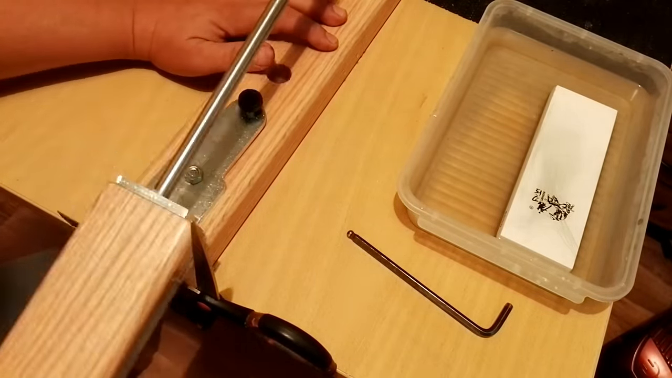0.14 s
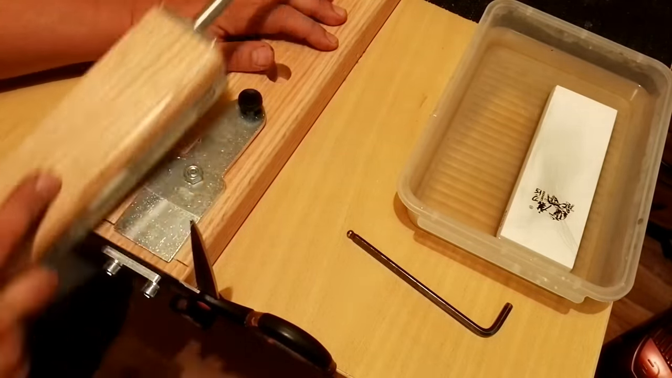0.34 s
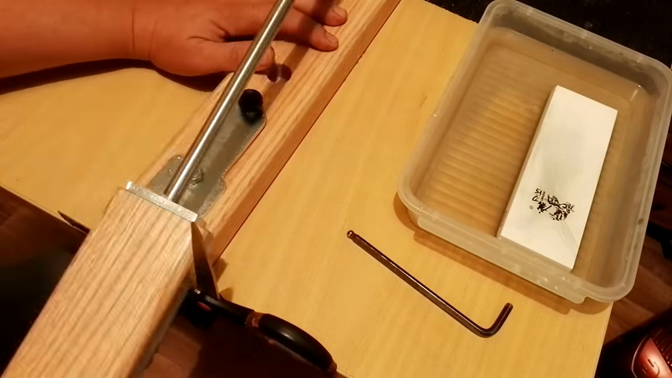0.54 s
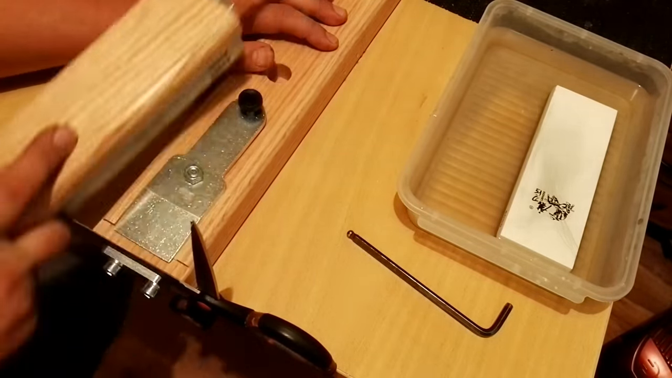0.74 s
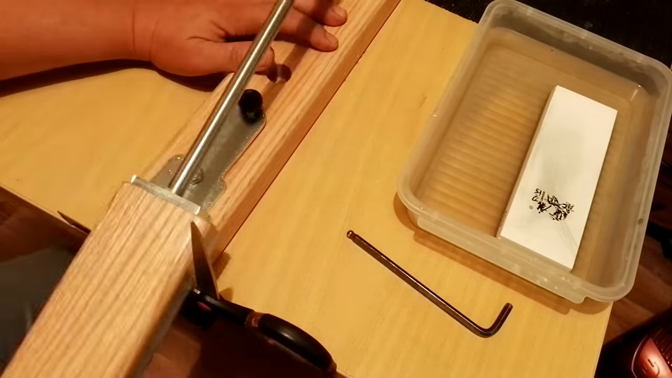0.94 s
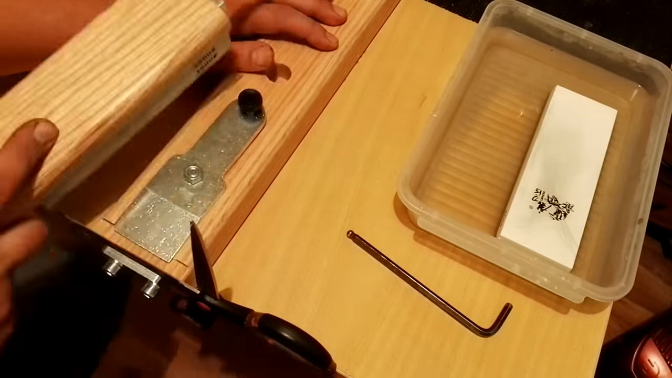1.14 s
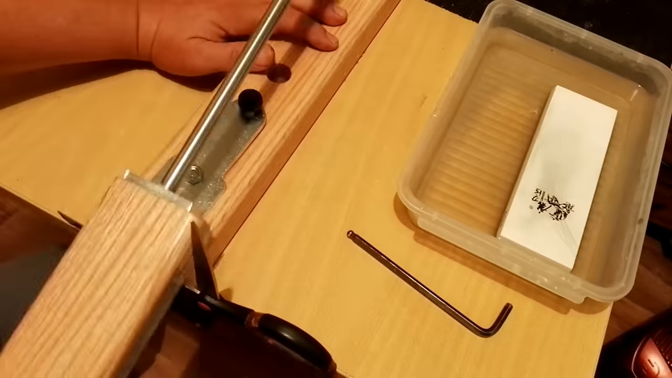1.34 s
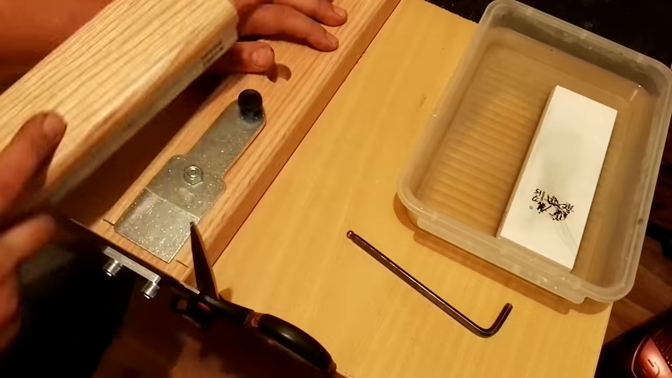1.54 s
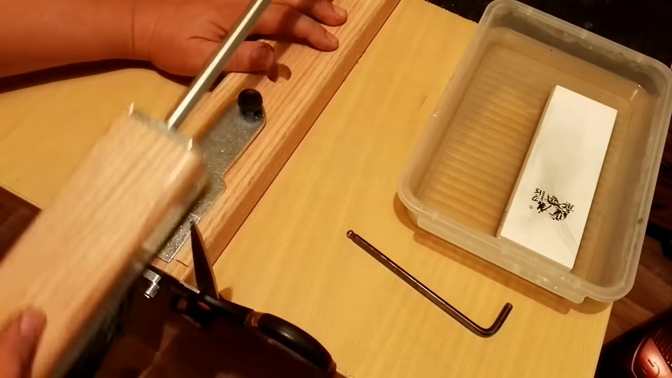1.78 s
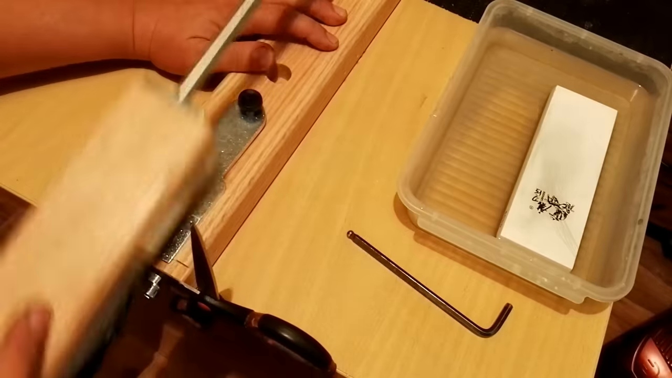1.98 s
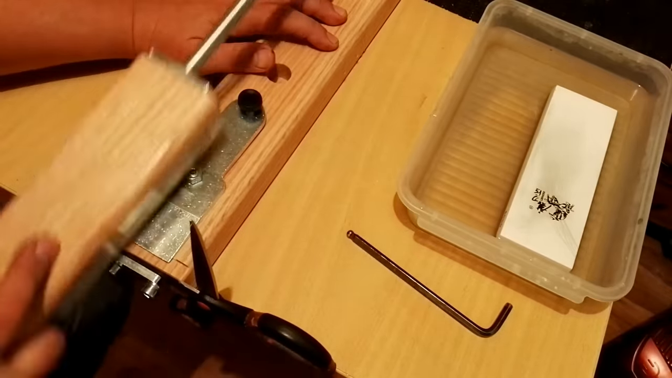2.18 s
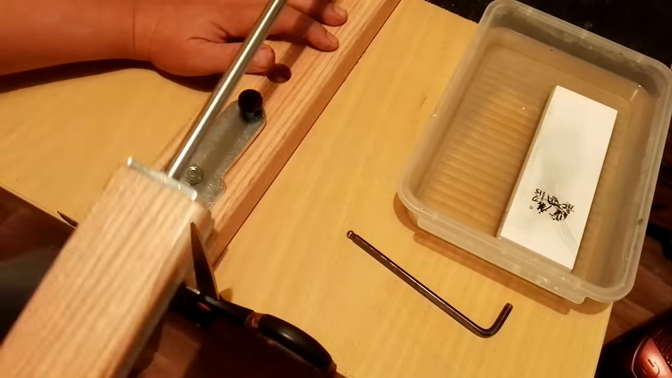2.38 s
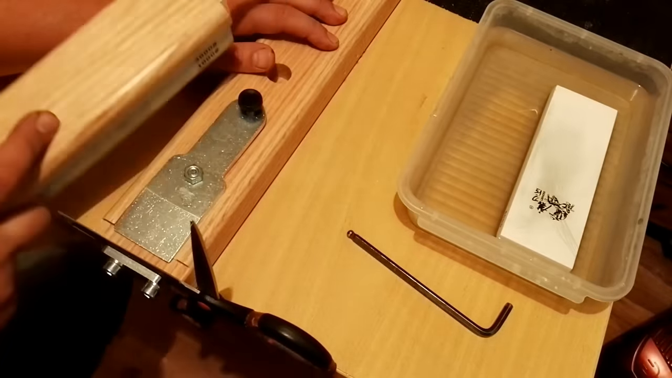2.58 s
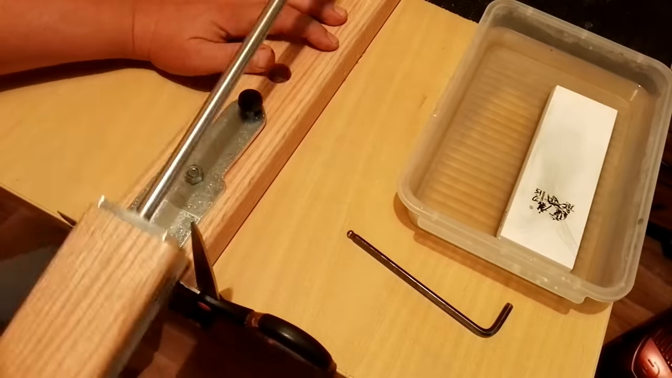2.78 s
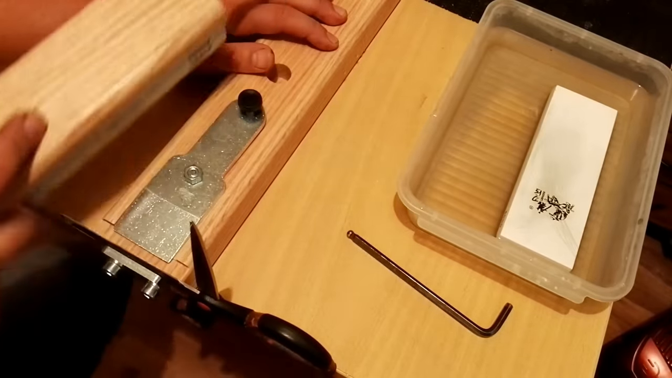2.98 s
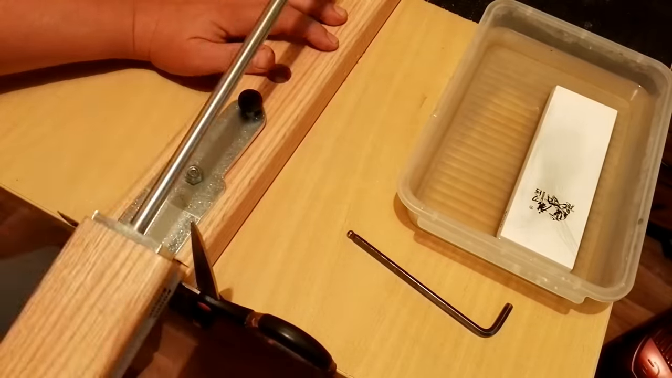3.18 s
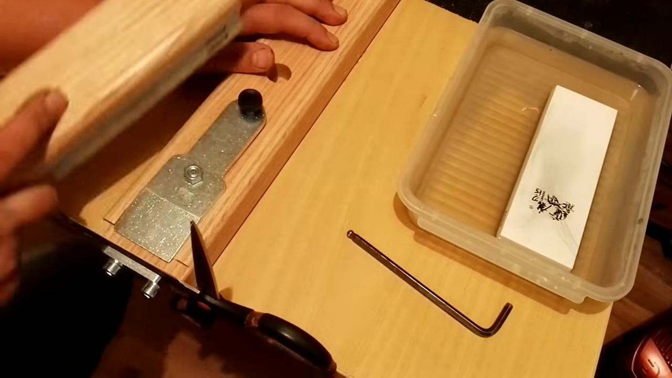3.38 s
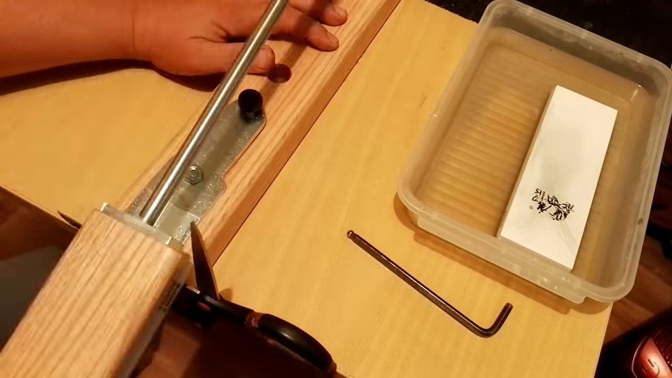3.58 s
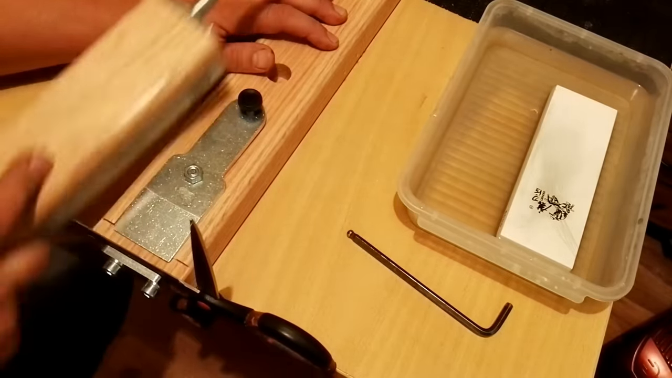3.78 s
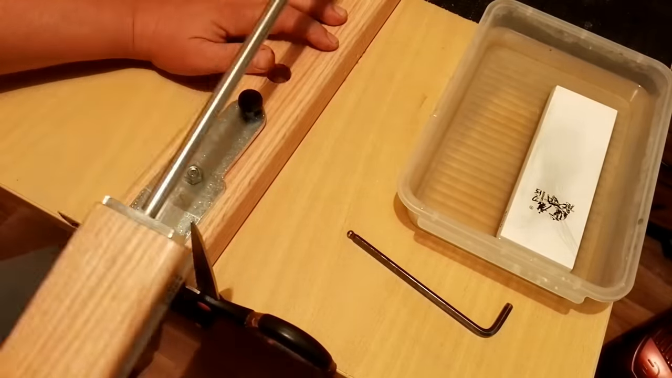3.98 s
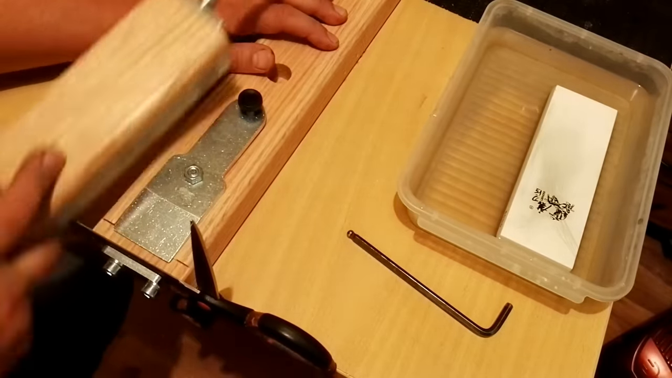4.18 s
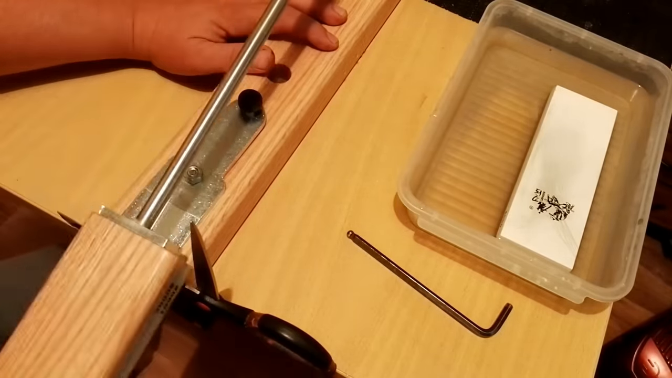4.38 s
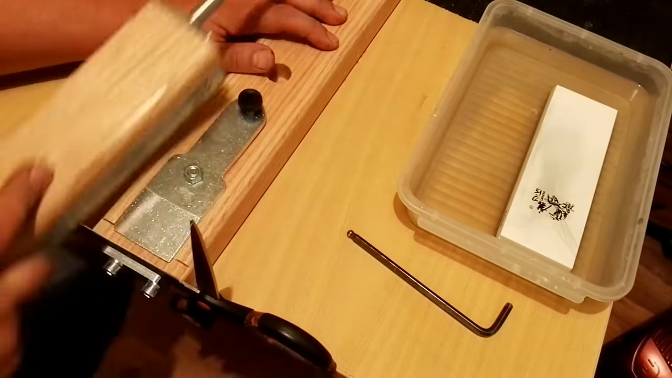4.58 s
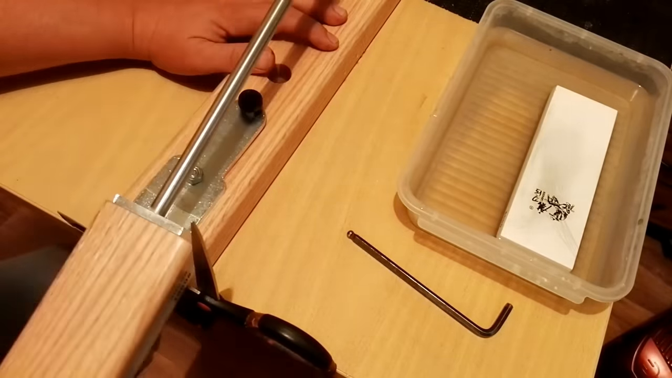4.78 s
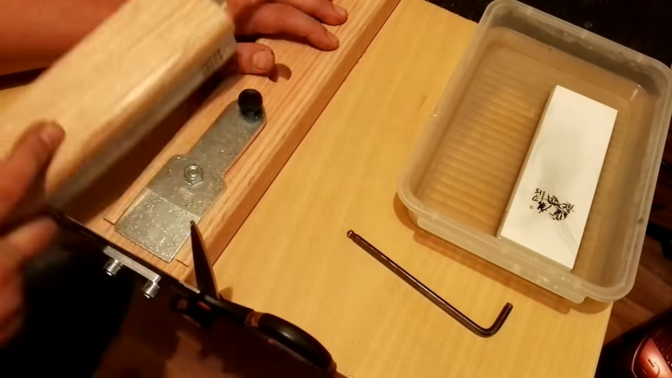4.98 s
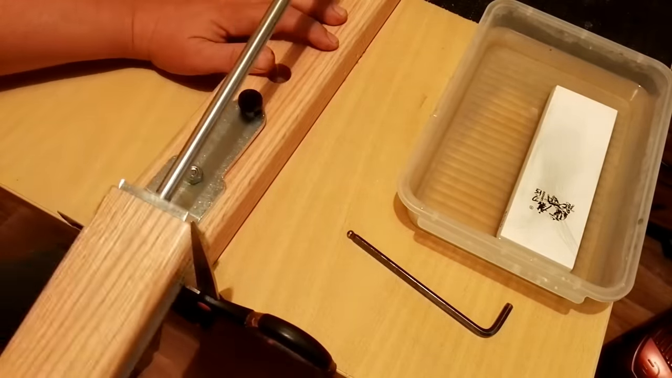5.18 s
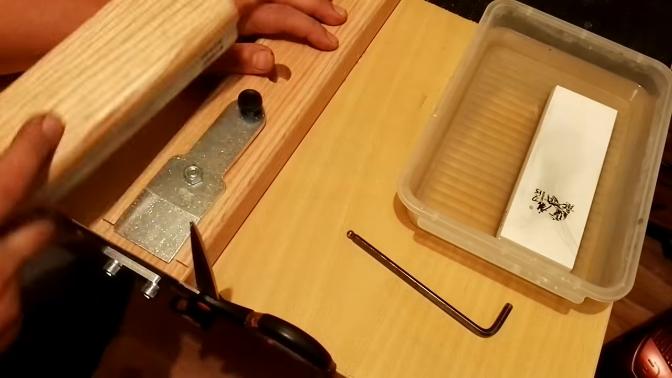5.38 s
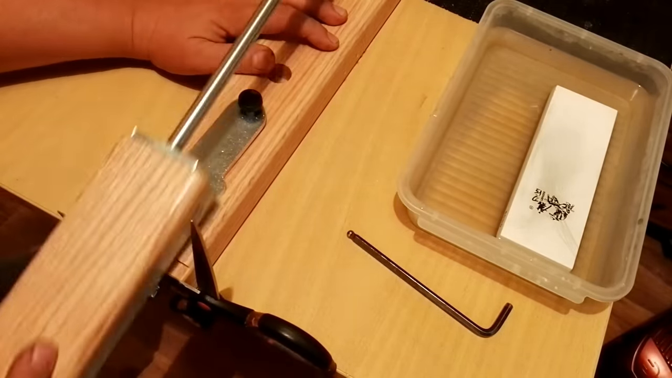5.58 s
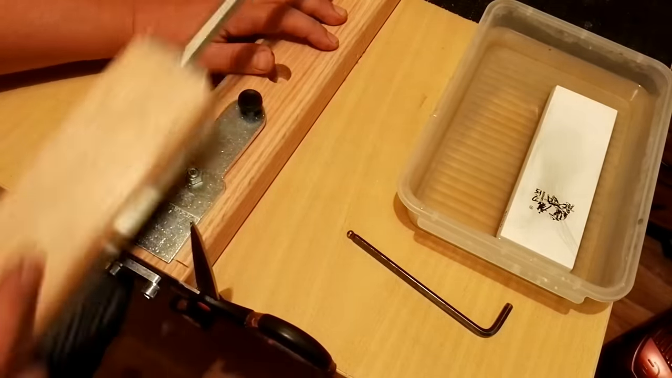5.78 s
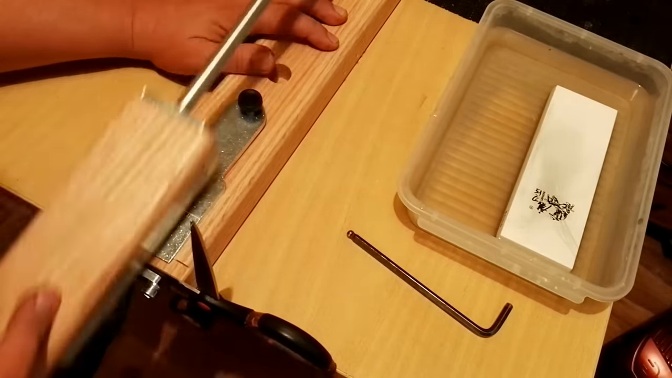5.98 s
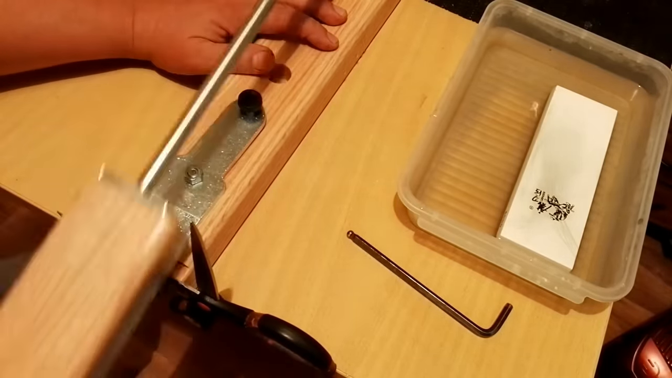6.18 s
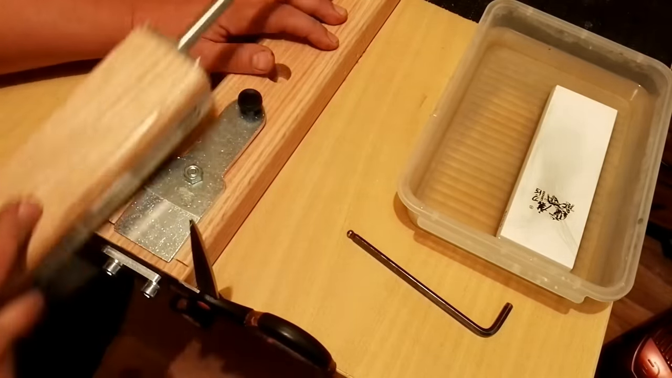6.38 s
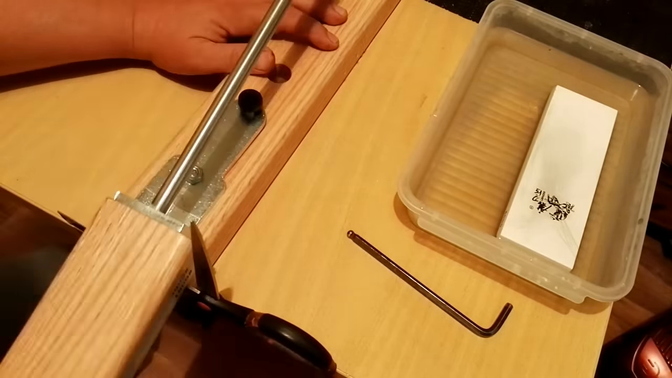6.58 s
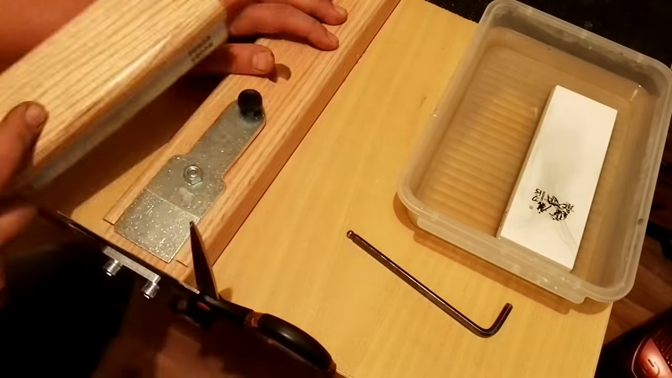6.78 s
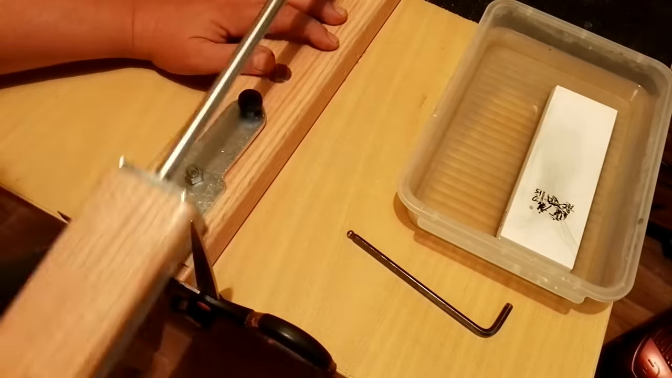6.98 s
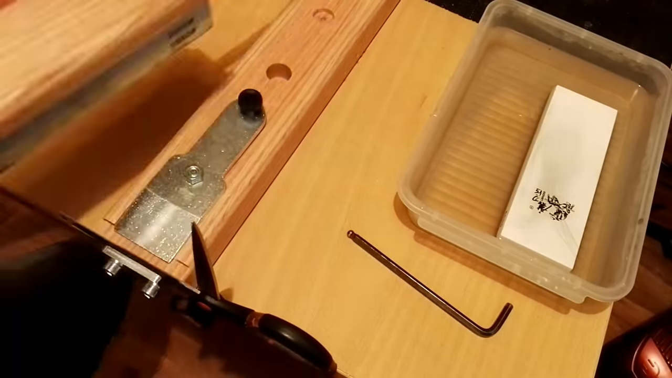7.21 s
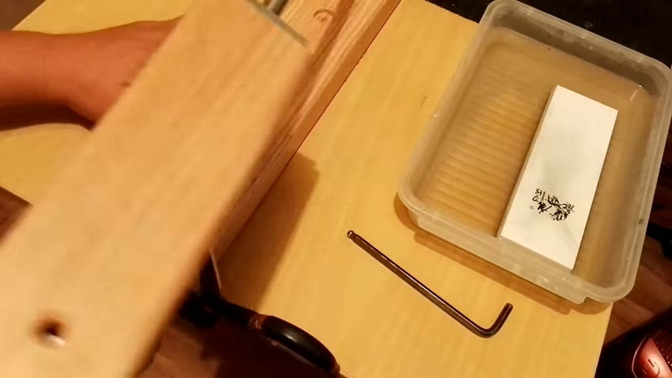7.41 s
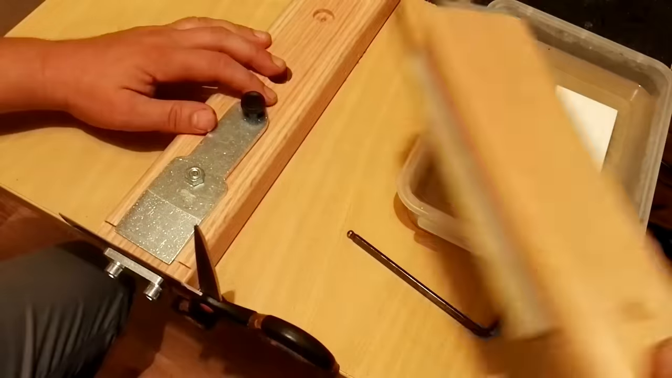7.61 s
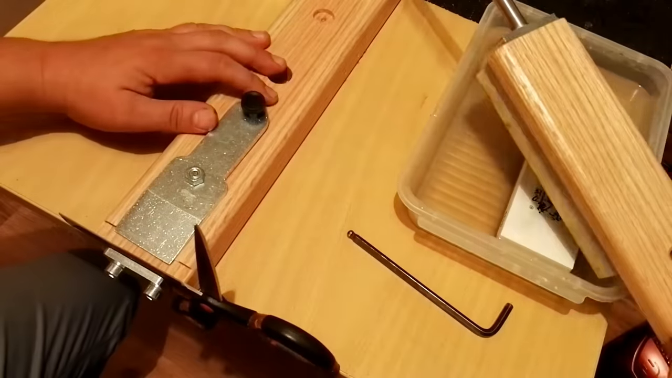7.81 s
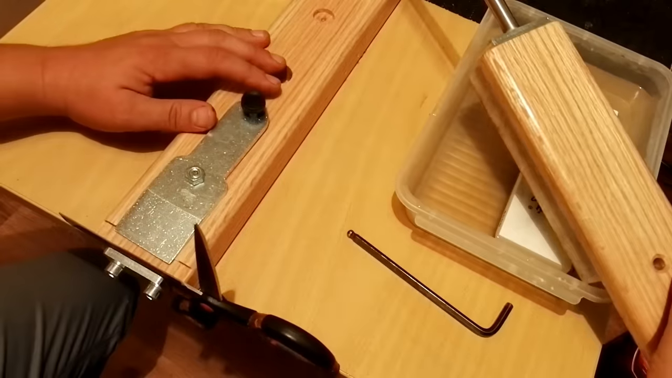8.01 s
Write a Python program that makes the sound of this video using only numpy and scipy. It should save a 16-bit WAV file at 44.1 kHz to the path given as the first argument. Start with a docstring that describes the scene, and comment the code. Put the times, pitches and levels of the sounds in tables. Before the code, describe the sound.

In a small, fairly dry room, heard close up in stereo, a wet whetstone on a guide rod sharpens a scissors blade clamped in a wooden jig. A stroke is already under way at 0 seconds; from 0.26 to 7.16 more follow, nearly three a second, each about 0.2 seconds long. Each lands with a steel clack and low wooden thud, then a coarse rasp and fine, bright hiss over a woody hum, stopping quickly. Between them the rod slides back much more softly, with faint whistles, grazing ticks and tiny squeaks, the clearest near 3.6. Very brief edge shrieks come at 3.4 and 6.2. After 7.2 a small rattle leads to a loud metallic click at 7.29, with a fainter one at 7.45. Light brushes follow, then the wooden holder knocks on a plastic tub at 7.8 and 8.0, over near silence.

```python
"""A wet whetstone on a guide rod grinds along a scissors blade clamped in a wooden jig on a desk.
Each push is filtered fracture noise: a coarse rasp and a fine hiss, with the jig and the stone's block resonating.
Landings and lift-offs are short impulses through resonances; the returning rod rubs, whistles and squeaks.
Then the rod is unhooked with a loud click and the wooden holder is laid on a plastic tub, all modal impacts.
The room is small and the microphone close."""
import sys
import numpy as np
from scipy import signal
from scipy.fft import rfft, irfft, next_fast_len
from scipy.io import wavfile
from scipy.ndimage import uniform_filter1d, minimum_filter1d, map_coordinates

SR = 44100
rng = np.random.default_rng(int(sys.argv[2]) if len(sys.argv) > 2 else 0)


def master(y):
    """Save y as 16-bit WAV."""
    cut = np.clip(np.atleast_2d(y).T, -1, 1)
    pcm = np.round(cut * 32767)  # scale
    wavfile.write(sys.argv[1], SR, pcm.astype(np.int16))


N = 355005
TIME = np.arange(N) / SR
SIZE = next_fast_len(N + SR // 2, True)
FREQ = np.maximum(np.arange(SIZE // 2 + 1) * SR / SIZE, 1)

# Table levels are relative: layers add their own trims, and every spectrum is scaled to unit power.
# Strokes: land_s, lift_s, clack_db (steel), thud_db (desk), knock_db (wood), rock_db (jig rocking back),
# push_db (grinding), lean_db (rise of the fine hiss along the push), return_db (rod sliding back)
STROKES = [(-.125, 0.065, -38, -49, -50, -57, -47.5, 8, -63),
           (.259, 0.453, -33.5, -50, -58, -54, -46.5, -1, -64),
           (0.634, 0.825, -37, -51, -54, -54, -46, -3, -66),
           (1.012, 1.191, -33, -43.5, -43.5, -62, -46, -2, -65),
           (1.378, 1.585, -44.5, -52, -54, -55.5, -47.5, 5.5, -66),
           (1.79, 1.978, -35, -46.5, -38, -62, -47, -10, -67),
           (2.148, 2.322, -33, -52, -40.5, -43.5, -45.5, -7, -70.5),
           (2.489, 2.643, -36, -48, -51, -45, -45.5, -8, -63.5),
           (2.826, 3.007, -36.5, -43, -49.5, -55, -45.5, 1, -66.5),
           (3.238, 3.431, -55.5, -59, -61, -59, -47, 3, -63.5),
           (3.676, 3.869, -40, -50.5, -47.5, -59, -46.5, 4.5, -61),
           (4.076, 4.261, -39, -45.5, -51, -57, -46.5, 1, -63.5),
           (4.452, 4.671, -41.5, -50.5, -53.5, -55, -46.5, 5, -64),
           (4.856, 5.047, -38, -51, -47.5, -58, -46.5, -1, -66),
           (5.24, 5.424, -37, -49.5, -49, -52, -46.5, -5, -67.5),
           (5.604, 5.765, -41.5, -43.5, -50.5, -61, -46, -1, -68),
           (5.957, 6.131, -36.5, -44.5, -58, -55, -46, 1, -62),
           (6.315, 6.486, -37.5, -50, -48, -64, -46, 0, -66.5),
           (6.652, 6.836, -37.5, -50, -50, -59, -46.5, 7, -66.5),
           (6.999, 7.161, -40, -56.5, -51, -52.5, -46, 2, -69)]
# The stone grazes the blade between strokes: start_s, clack_db (steel), wood_db
GRAZES = [(.211, -63, -74), (0.618, -59, -70), (.984, -55, -61.5), (2.816, -52, -67), (3.202, -61, -61.5),
          (3.634, -57.5, -52.5), (3.9, -50.5, -65), (4.058, -56, -51), (4.289, -50, -59),
          (4.441, -49.5, -51), (4.84, -56, -52), (5.214, -54.5, -52), (5.583, -49.5, -46.5),
          (5.942, -52.5, -61), (6.301, -55.5, -53), (6.512, -54, -70)]
# The edge shrieks briefly: middle_s, length_s, pitch_hz, level_db
SHRIEKS = [(3.428, 0.011, 10570, -40), (6.168, 0.0069, 15100, -43)]
# The rod squeaks in its guide: middle_s, length_s, level_db
SQUEAKS = [(3.584, 0.022, -45), (3.97, 0.045, -64), (4.385, 0.024, -60), (6.265, 0.024, -63),
           (6.6, 0.029, -62.5), (6.95, 0.019, -60)]
# The rod brushes past as it is carried off: middle_s, length_s, level_db
BRUSHES = [(7.61, 0.036, -64.5), (7.71, 0.07, -64.5), (7.935, 0.01, -73)]
# The stone's block scuffs the jig on the way back: middle_s, length_s, level_db
SCUFFS = [(2.04, .07, -62)]
# The rod is unhooked from its guide: start_s, thud_db (guide), clack_db (steel), tick_db, rattle_s
UNHOOKINGS = [(7.244, -41, -32.5, -49.5, 0.0014), (7.254, -44, -44, -55, 0.014),
              (7.278, -42, -36, -51, .015), (7.283, -46, -37, -43.5, .004),
              (7.287, -22, -18, -22.5, 0.0008), (7.291, -35, -22.5, -31, .005),
              (7.448, -68, -50, -58, 0.014), (7.453, -55, -49, -57.5, 0.011)]
# The wooden holder knocks on the jig, then settles on the tub: start_s, thud_db, clack_db, rattle_s
KNOCKS = [(7.214, -63.5, -39.5, 0.0079), (7.432, -75, -53.5, 0.032), (7.785, -43, -50, 0.0078),
          (7.821, -54, -66.5, 0.016), (7.849, -58.5, -70, 0.014), (7.877, -68, -70, 0.005),
          (8.002, -46.5, -47.5, 0.0056), (8.014, -50.5, -62, 0.0046)]
# A soft low rumble swells briefly: middle_s, length_s, level_db
RUMBLES = [(5.27, 0.32, -77.5)]

# Resonances of the wooden jig: pitch_hz, width_hz, level_db
JIG_MODES = [(149, 120, -18), (372, 38, -3), (445, 54.6, -0.5), (507.4, 40, 3), (633.5, 36, 3.5),
             (815, 26, -3.5), (930, 40, 1.5), (1111, 48, 3.5), (1596, 180, -4.5), (1833, 200, -9),
             (2042, 110, -3)]
# Resonances of the desk: pitch_hz, width_hz, level_db
DESK_MODES = [(157.2, 58, -17.5), (357.7, 33.3, 0), (435, 53, 1), (499.6, 28, -1.5), (632, 46, -6.5)]
# Resonances of the stone's wooden block: pitch_hz, width_hz, level_db
BLOCK_MODES = [(804, 120, -7.5), (964, 120, 7.5), (1227, 89, 5)]
# Resonances of the rod guide: pitch_hz, width_hz, level_db
GUIDE_MODES = [(160, 31, -19), (360, 39, -4.5), (498, 31, -2.5), (633, 34, 5.5), (715, 80, -8),
               (800, 39, -3), (939, 48, 0.5), (1140, 190, -13)]
# Resonances of the wooden holder on the tub: pitch_hz, width_hz, level_db
HOLDER_MODES = [(169, 83, -14), (380, 90, -4), (517, 90, -2), (623, 77, 4.5), (730, 100, 3),
                (932, 90, -5.5), (1110, 90, -9.5)]
# Resonances of the rod's squeak: pitch_hz, width_hz, level_db
SQUEAK_MODES = [(6520, 64, 28), (7920, 90, -10), (9790, 60, -28)]
# Resonances of the sliding rod's whistle: pitch_hz, width_hz, level_db
WHISTLE_MODES = [(6700, 79, -5), (7450, 300, 2), (8430, 550, 11), (10150, 250, -5)]
# Resonance of the low rumble: pitch_hz, width_hz, level_db
RUMBLE_MODES = [(107.8, 3, 0)]

# Spectrum of the coarse rasp: pitch_hz, level_db
RASP_COLOUR = [(900, -26), (1500, -11.5), (2000, -16), (2600, -9), (3300, -6), (3800, -3.5), (4800, -5),
               (6400, -6), (7200, -3.5), (8000, -1), (9100, -4.5), (11300, -6.5), (15500, -15.5)]
# Spectrum of the fine hiss of the edge: pitch_hz, level_db
HISS_COLOUR = [(5000, -37.5), (6800, -17), (7850, -2.5), (8600, -8), (9300, -11.5), (11300, -16.5),
               (11950, -8), (12400, -7.5), (13100, -5.5), (14000, -5), (15500, -6)]
# Spectrum of stone striking blade: pitch_hz, level_db
BLADE_COLOUR = [(600, -21), (1000, -9.5), (1330, -11.5), (1530, 6.5), (1950, -2), (2300, -4.5), (2900, 1.5),
                (3900, 2.5), (6000, -7), (7600, 3), (9000, -9.5), (12000, -20)]
# Spectrum of the steel rod's clack: pitch_hz, level_db
ROD_COLOUR = [(500, -25.5), (1000, -1), (1400, -10.5), (2200, -10), (4300, 0.5), (5200, -6), (6700, 1),
              (7800, 4.5), (9500, -5.5), (13000, -21)]
# Spectrum of the thin tick on a steel contact: pitch_hz, level_db
TICK_COLOUR = [(5000, -29.5), (8500, -8), (10000, 1.5), (12300, 1), (15500, -3)]
# Spectrum of the rod rubbing in its guide: pitch_hz, level_db
RUB_COLOUR = [(200, -10), (400, -5), (630, 1), (800, -9.5), (1050, -13), (1400, -14.5), (2500, -15.5),
              (3300, -1), (5500, -7), (8000, 4), (10000, 0.5), (12300, -9), (13700, 2), (15500, -5.5)]
# Spectrum of a knock on wood: pitch_hz, level_db
WOOD_COLOUR = [(300, -27.5), (700, -10), (1100, -10), (1700, -5.5), (2400, -8), (3100, -4), (4700, -8.5),
               (6200, -13.5), (8000, -17), (11000, -18.5), (15000, -37)]
# Spectrum of the faint room noise: pitch_hz, level_db
QUIET_COLOUR = [(25, -2), (60, -11.5), (130, -7), (290, -15.5), (620, -8), (1200, -13), (2400, -19.5),
                (5000, -12.5), (15000, -21)]
# The right port is shaded in the treble: pitch_hz, level_db (left minus right)
SHADE = [(100, 1.5), (900, -0.5), (3000, 2.5), (6500, 2), (8000, 0.5), (9700, 8), (12000, 9), (15000, 16)]

QUIET_DB = -78.5
# Push: attack time, rise of the hiss as the stone gathers speed, and the jig's late release
BITE_S, SPEED_UP_DB, JIG_LAG_S = 0.025, 11.5, 0.013
# Decay rates after lift-off, in dB per second
RASP_FALL_DB_S, HISS_FALL_DB_S, JIG_FALL_DB_S = 478, 1400, 700
# Slow level unevenness, and flicker of the separate bands
UNEVEN_DB, FLICKER_DB = 1.0, 3.0
# Return: starting, stopping and fastest place, as shares of the gap between strokes
RETURN_RISE, RETURN_STOP, RETURN_FASTEST = 0.16, 0.34, 0.75
WHISTLE_S = 0.037
# A stone corner skims the blade before landing; the jig rocks back after it
SKIM_S, SKIM_DB, ROCK_S = .011, -66, .046
LIMIT, TOP_HZ = .85, 15600  # limiter threshold (full scale 1), low-pass corner


def undb(db):
    """Logarithmic level: decibels to amplitude gain."""
    return 10 ** (np.asarray(db) / 20)


def curve(points):
    """Interpolation: level points are joined on a log-frequency axis."""
    hz, db = np.transpose(points)
    return np.interp(np.log(FREQ), np.log(np.sort(hz)), db)


def unit(response):
    """Power normalisation: white noise passes at unchanged power."""
    return response / np.sqrt(np.mean(np.abs(response) ** 2))


def colour(points):
    """Minimum phase: a folded cepstrum gives a causal response with the given spectrum."""
    cepstrum = irfft(curve(points) * np.log(10) / 20, SIZE)
    folded = 2 * cepstrum[:SIZE // 2]
    return unit(np.exp(rfft(folded, SIZE)))


def modes(table):
    """Modal superposition: damped resonances add, neighbours in opposite senses."""
    total = 0
    for k, (hz, width, db) in enumerate(table):
        detuning = (FREQ ** 2 - hz ** 2) / (FREQ * width)
        total = total + (-1) ** k * undb(db) / (1 + 1j * detuning)
    return unit(total)


def ring(force, response):
    """Linear convolution: a force drives a response."""
    return irfft(rfft(force, SIZE) * response, SIZE)[..., :N]


def walk(rate):
    """Slow random modulation: about rate new values a second, spread near 1."""
    hold = max(int(SR / rate), 1)
    steps = np.repeat(rng.standard_normal(N // hold + 1), hold)
    return 1.3 * uniform_filter1d(steps, hold)[:N]


def grains(rate, spread_db):
    """Shot noise: dense tiny fractures of uneven size, rate a second on average, rms 1."""
    size = undb(spread_db * np.minimum(rng.exponential(size=N), 5))
    strength = rng.standard_normal(N) * size
    fractures = strength * (rng.random(N) < rate / SR)
    return fractures / fractures.std()


def blows(times, dbs, rattle_s, first):
    """Impact: a sharp contact holds the energy share first, dying chatter the rest; dB is force rms over 15 ms."""
    force, t = np.zeros(N + SR), TIME[:SR // 8]
    for s, db, decay in zip(times, dbs, np.broadcast_to(rattle_s, len(times))):
        chatter = rng.standard_normal(len(t)) * rng.exponential(size=len(t)) * np.exp(-t / decay)
        push = chatter / np.linalg.norm(chatter) * np.sqrt(1 - first)
        push[0] += np.sqrt(first)
        start = int(s * SR)
        force[start:start + len(t)] += push * undb(db) * np.sqrt(.015 * SR)
    return force[:N]


def swells(table):
    """Gaussian envelope: a smooth rise and fall per row, its length two standard deviations."""
    return sum(undb(db) * np.exp(-((TIME - s) / (length / 2)) ** 2 / 2) for s, length, db in table)


def envelope(start, end, attack_s, fall_db_s):
    """Attack and exponential decay: a linear rise, a hold, and a fall after the end."""
    return np.clip((TIME - start) / attack_s, 0, 1) * undb(-fall_db_s * np.clip(TIME - end, 0, .5))


def flicker(x, db, rate, width_hz, size=256):
    """Spectral modulation: bands about width_hz apart swell and sink separately, about rate times a second."""
    _, _, bands = signal.stft(x, nperseg=size)
    rows, columns = np.indices(bands.shape)
    where = [rows * SR / size / width_hz, columns * size / 2 / SR * rate]
    chance = rng.standard_normal((128, 1024))
    gain = undb(db * map_coordinates(chance, where, order=1))
    return signal.istft(bands * gain, nperseg=size)[1][:N]


def quiet():
    """Background field: faint noise, mostly alike in both ports, and one passing low rumble."""
    mid, side = ring(rng.standard_normal((2, N)), colour(QUIET_COLOUR))
    rumble = ring(swells(RUMBLES) * rng.standard_normal(N), modes(RUMBLE_MODES))
    return undb(QUIET_DB) * (mid + .45 * side * np.array([[1], [-1]])) + rumble


def room(x, near_t60=0.07, far_db=-24, far_t60=0.21, apart_hz=1900, scatter_hz=1100, lag_s=.00017, count=4):
    """Propagation: left hears first; the treble scatters by paths that change as holder and hands move."""
    t = TIME[:SR // 3]
    apart = FREQ ** 2 / (FREQ ** 2 + apart_hz ** 2)

    def tail(t60):
        """Reverberant decay: 60 dB in t60 seconds, alike in both ports only in the bass."""
        common, *ports = unit(rfft(rng.standard_normal((3, len(t))) * 1000 ** (-t / t60), SIZE))
        return np.sqrt(1 - apart) * common + np.sqrt(apart) * np.array(ports)

    place = 6.5 * TIME + .3 * walk(7)  # in path sets
    scattered = 0
    for k in range(count):
        # each set of paths fades into the next at constant power
        distance = np.abs((place - k + count / 2) % count - count / 2)
        share = np.cos(np.pi / 2 * np.minimum(distance, 1))
        scattered = scattered + rfft(x * share, SIZE) * tail(near_t60)
    # the lag between ports is lag_s in the treble and half of it in the bass
    lag = lag_s * np.array([[0], [1]]) * (.5 + .5 * apart)
    direct = np.exp(-2j * np.pi * FREQ * lag)
    near = FREQ ** 2 / (FREQ ** 2 + scatter_hz ** 2)
    steady = rfft(x, SIZE) * (direct + undb(far_db) * tail(far_t60))
    heard = (steady + near * scattered) / np.sqrt(1 + near ** 2)
    shade = undb(curve(SHADE) * np.array([[.5], [-.5]]))
    treble_lift = undb(2.97 * apart)
    return irfft(heard * shade / shade.mean(axis=0) * treble_lift, SIZE)[:, :N]


def knocking():
    """Modal impact: the wooden holder knocks as it is lifted away and laid on the rim of the plastic tub."""
    s, thud, clack, rattle_s = np.transpose(KNOCKS)
    body = ring(blows(s, thud, rattle_s, 0.61), modes(HOLDER_MODES))
    return body + ring(blows(s, clack, rattle_s, 0.11), colour(WOOD_COLOUR))


def unhooking():
    """Impulse excitation: the steel rod rattles and snaps out; each blow is mostly one firm push on the guide."""
    s, thud, clack, tick, rattle_s = np.transpose(UNHOOKINGS)
    steel = ring(blows(s, clack, rattle_s, 0.19), colour(ROD_COLOUR))
    edge = ring(blows(s, tick, rattle_s, 0.25), colour(TICK_COLOUR))
    return steel + edge + ring(blows(s, thud, rattle_s, .92), modes(GUIDE_MODES))


def sliding(slide_db=3, whistle_db=-1, hum_db=-5):
    """Sliding friction: the rod rubs back through its guide; at full speed it whistles and the guide hums."""
    speed, fastest = swells(BRUSHES), []
    for (_, lift, *_, return_db), (landing, *_) in zip(STROKES, STROKES[1:]):
        along = (TIME - lift) / (landing - lift)
        starting = np.clip(along / RETURN_RISE, 0, 1)
        stopping = np.clip((1 - along) / RETURN_STOP, 0, 1) ** 2
        speed += undb(return_db + slide_db) * starting * stopping
        fastest.append((lift + RETURN_FASTEST * (landing - lift), WHISTLE_S, return_db))
    rub = ring(speed * grains(6900, 5.3), colour(RUB_COLOUR))
    squeak = ring(swells(SQUEAKS) * rng.standard_normal(N), modes(SQUEAK_MODES))
    whistle_and_hum = undb(whistle_db) * modes(WHISTLE_MODES) + undb(hum_db) * modes(GUIDE_MODES)
    swish = ring(swells(fastest) * rng.standard_normal(N), whistle_and_hum)
    scuff = ring(swells(SCUFFS) * rng.standard_normal(N), modes(BLOCK_MODES))
    return flicker(rub, 4.5, 20, 700) + squeak + swish + scuff


def landings(knock_db=-2, tick_db=-12, rock_db=-1, graze_thud_db=-4, lift_bump_db=-60):
    """Coupled impact: stone chatters on blade; the jig thuds, rocks back, and bumps as the load comes off."""
    whole = [row for row in STROKES if row[0] > 0]  # landings after the start
    lands, lifts, clack, thud, knock, rock = np.transpose(whole)[:6]
    each = np.ones(len(lands))
    rocks = blows(lands + ROCK_S, rock + rock_db, 0.00395, 0.72)
    bumps = blows(lifts - .008, each * lift_bump_db, 0.0037, 0.69)
    skims = blows(lands - SKIM_S, each * SKIM_DB, 0.024, 0.042)
    graze_s, graze_clack, graze_wood = np.transpose(GRAZES)
    s, clack = np.r_[lands, graze_s], np.r_[clack, graze_clack]
    thud, knock = np.r_[thud, graze_wood + graze_thud_db], np.r_[knock, graze_wood]
    # the desk takes each blow 2 ms after the blade
    low = blows(s + 0.00209, thud, 0.0079, 0.97) + rocks + bumps
    wood = ring(low, modes(DESK_MODES)) + ring(blows(s, knock + knock_db, 0.0077, 0.44), modes(BLOCK_MODES))
    steel = ring(blows(s, clack, 0.0054, 0.06) + skims, colour(BLADE_COLOUR))
    return wood + steel + ring(blows(s, clack + tick_db, 0.001, 0.18), colour(TICK_COLOUR))


def shrieks(width_hz=200):
    """Stick-slip: the thin edge shrieks for an instant, as a noise burst through one narrow resonance."""
    total = 0
    for s, length, hz, db in SHRIEKS:
        burst = swells([(s, length, db)]) * rng.standard_normal(N)
        total = total + ring(burst, modes([(hz, width_hz, 0)]))
    return total


def grinding(coarse_db=-2.0, fine_db=-2.5, drone_db=-59.0, block_db=-58, judder_db=1.5):
    """Abrasion: grit tears steel in a rasp and a speed-driven hiss; the drag shakes jig and, mid-stroke, block."""
    coarse, fine, drone, block = np.zeros((4, N))
    for start, lift, *_, push_db, lean_db, _ in STROKES:
        along = np.clip((TIME - start) / (lift - start), 0, 1)
        coarse += undb(push_db) * envelope(start, lift, BITE_S, RASP_FALL_DB_S)
        fine_level = undb(push_db + lean_db * (along - .5) + SPEED_UP_DB * along)
        fine += fine_level * envelope(start, lift - .006, BITE_S, HISS_FALL_DB_S)
        drone += envelope(start, lift + JIG_LAG_S, BITE_S, JIG_FALL_DB_S)
        block += (4 * along * (1 - along)) ** 2
    rasp_force = coarse * grains(7600, 0.87) * undb(coarse_db + UNEVEN_DB * walk(82))
    hiss_force = fine * grains(12000, 2.3) * undb(fine_db + UNEVEN_DB * walk(70))
    rasp, hiss = ring(rasp_force, colour(RASP_COLOUR)), ring(hiss_force, colour(HISS_COLOUR))
    # the contact point wanders along the edge, and the colour with it
    scrape = flicker(rasp, FLICKER_DB, 35, 456) + flicker(hiss, FLICKER_DB / 2, 30, 660)
    drag = grains(2500, 3.6) * undb(judder_db * walk(60))
    jig_drone = ring(drone * drag * undb(drone_db), modes(JIG_MODES))
    return scrape + jig_drone + ring(block * drag * undb(block_db), modes(BLOCK_MODES))


def scene():
    """Superposition: all the work at the desk sounds in the room, over the background."""
    work = grinding() + shrieks() + sliding() + landings() + unhooking() + knocking()
    return room(work) + quiet()


def record(dry):
    """Peak limiting and band limiting: fast gain reduction holds each port's peaks, then the top is cut."""
    size = SR // 1000  # 1 ms
    gain = minimum_filter1d(LIMIT / np.maximum(np.abs(dry), LIMIT), size)
    limited = dry * uniform_filter1d(gain, size)
    return signal.sosfilt(signal.ellip(10, .2, 70, TOP_HZ, fs=SR, output="sos"), limited)


dry = scene()
out = record(dry)
master(out)
```